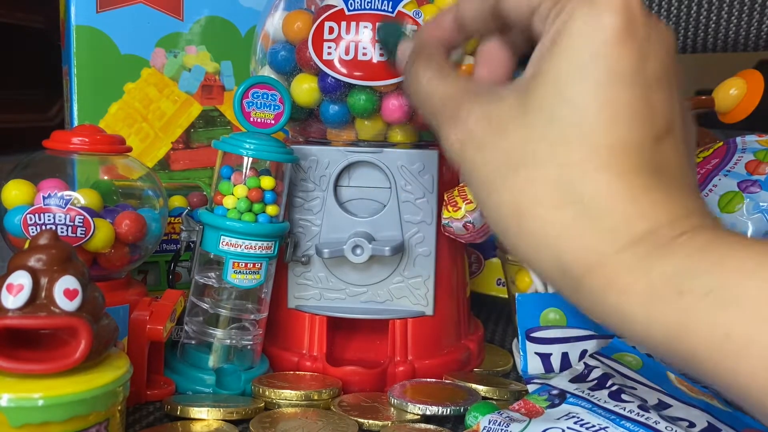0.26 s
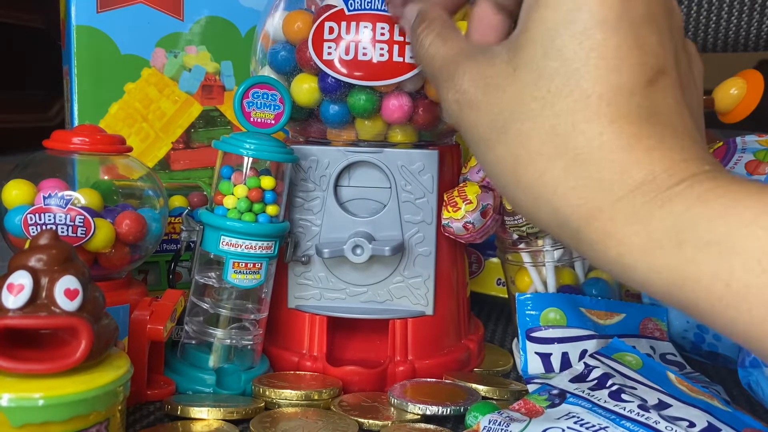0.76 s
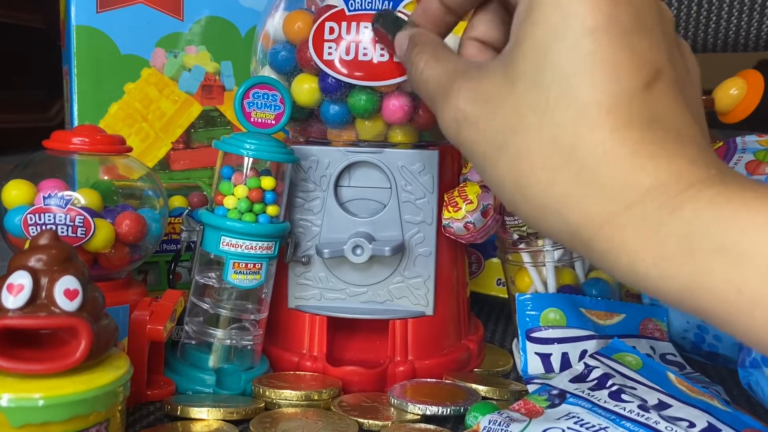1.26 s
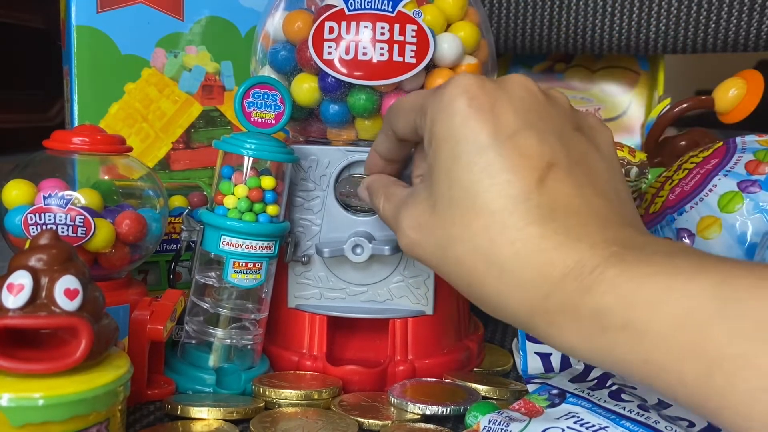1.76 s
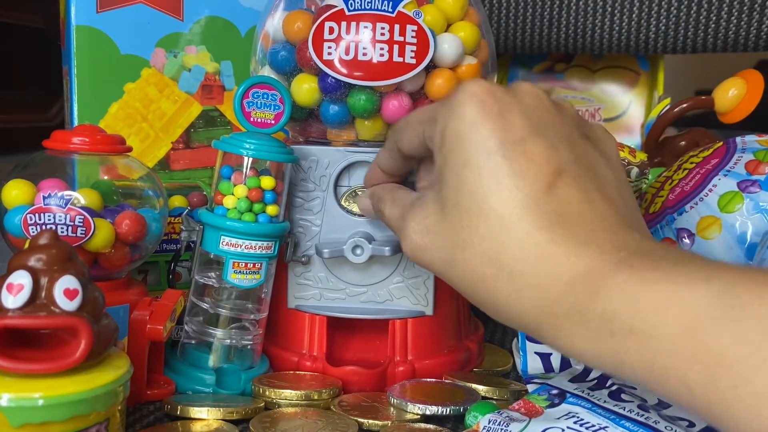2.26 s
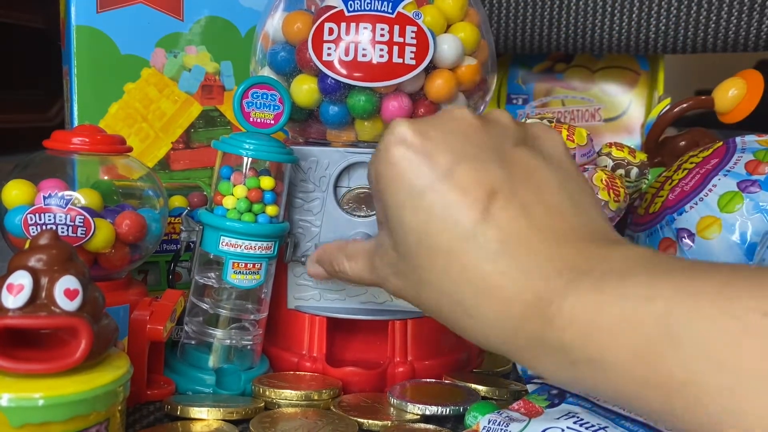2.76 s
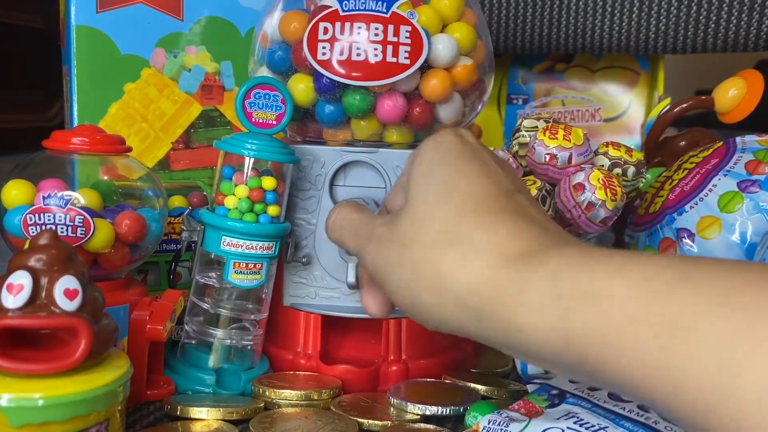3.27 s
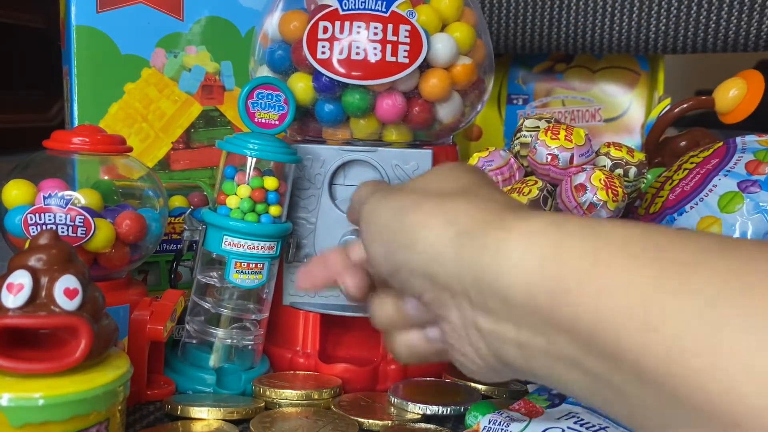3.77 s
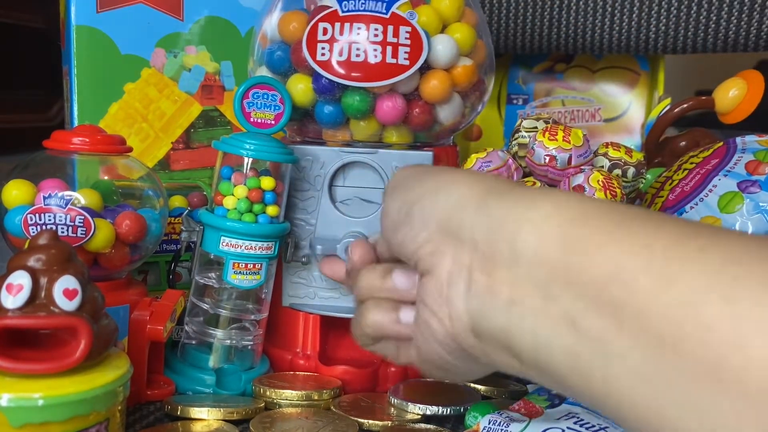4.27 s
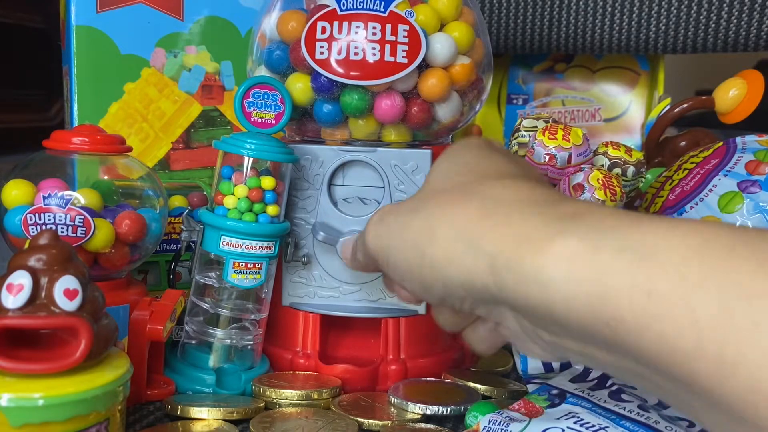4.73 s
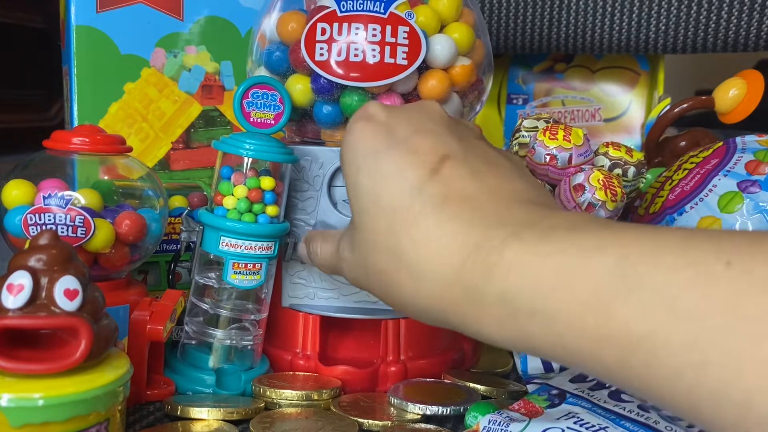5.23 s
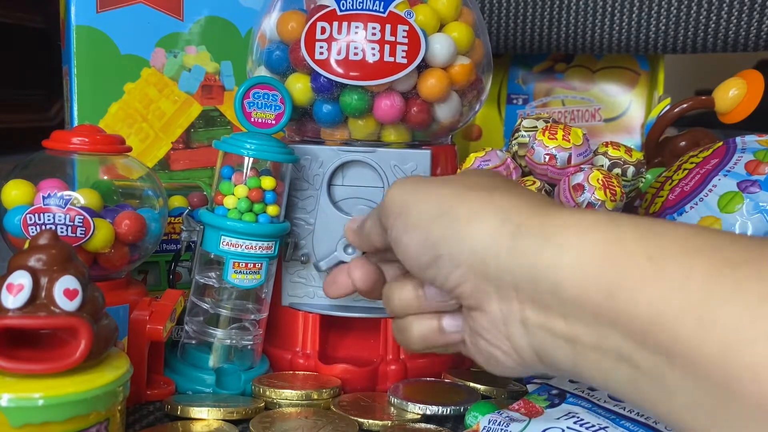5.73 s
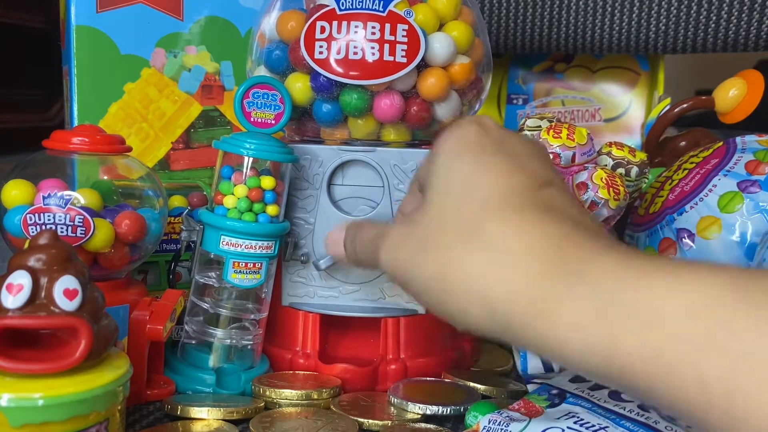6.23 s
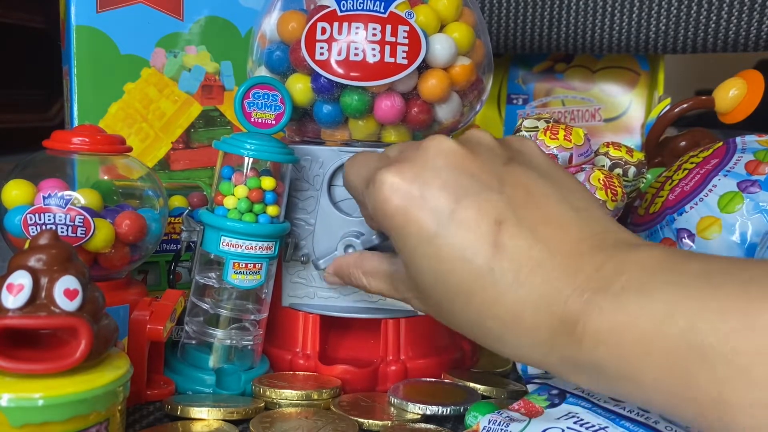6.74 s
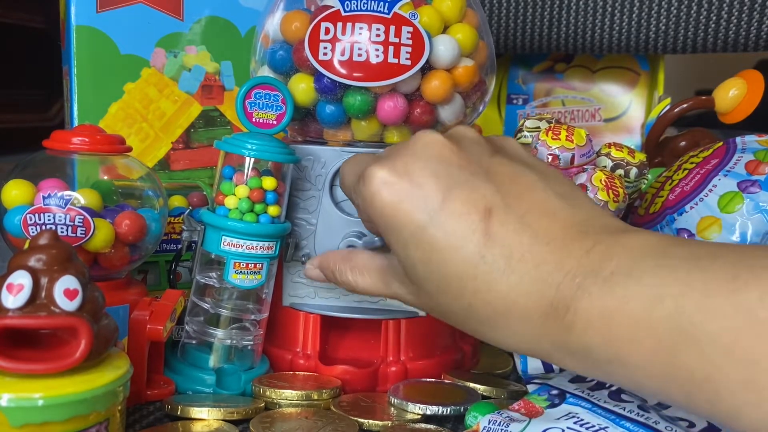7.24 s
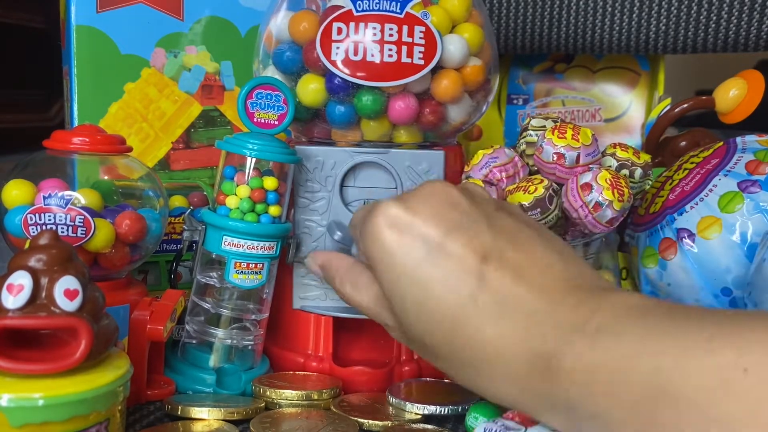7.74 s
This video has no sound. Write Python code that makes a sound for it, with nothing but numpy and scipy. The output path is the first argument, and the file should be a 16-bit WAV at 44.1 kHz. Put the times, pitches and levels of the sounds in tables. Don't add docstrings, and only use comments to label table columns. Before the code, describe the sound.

Close dry taps, a coin clicking at a slot, irregular plastic gear clacks and rattling candy in a small quiet room.

```python
import sys
import numpy as np
from scipy import signal
from scipy.fft import rfft, irfft, next_fast_len
from scipy.io import wavfile
from scipy.ndimage import uniform_filter1d

SR = 44100
rng = np.random.default_rng(int(sys.argv[2]) if len(sys.argv) > 2 else 0)


def pcm_store(signal):
    levels = np.round(np.clip(np.atleast_2d(signal), -1, 1) * 32767)
    wavfile.write(sys.argv[1], SR, levels.astype(np.int16).T)


def voltage_ratio(decibels):
    exponent = np.asarray(decibels, float) / 20
    return 10 ** exponent


N = 352800


def rms_one(x):
    return x / np.sqrt(np.mean(x ** 2) + 1e-20)


def in_time(rows):
    s, level = np.transpose(rows)
    return np.interp(np.arange(N) / SR, s, level)


def at_hz(points, hz):
    table_hz, value = np.transpose(points)
    return np.interp(np.log(hz), np.log(table_hz), value)


def drift(rate_hz):
    r = np.exp(-80 * np.pi * rate_hz / SR)
    noise = rng.standard_normal(N // 40 + 2002)
    slow = signal.lfilter([1], [1, -2 * r, r * r], noise)[2000:]
    return np.interp(np.arange(N) / 40, np.arange(len(slow)), rms_one(slow))


def bandpass(order, low_hz, high_hz):
    return signal.butter(order, [low_hz, high_hz], "band", fs=SR, output="sos")


def highpass(x, order, hz):
    return signal.sosfilt(signal.butter(order, hz, "high", fs=SR, output="sos"), x)


def stereo(mid, side, alike):
    return np.sqrt(1 + alike) * mid + np.sqrt(1 - alike) * side * [[1], [-1]]


BAND_EDGES = (180, 1200, 4000, 8000, 15000)


def resonances(modes, widen, crack_db, size):
    hz, width_hz, level_db = np.transpose(modes)[:, :, None]
    w = 2 * np.pi * np.arange(size // 2 + 1) / size
    z, r = np.exp(-1j * w), np.exp(-np.pi * width_hz * widen / SR)
    poles = 1 - 2 * r * np.cos(2 * np.pi * hz / SR) * z + r * r * z * z
    rings = voltage_ratio(level_db) * (1 - r * r) / 2 * (1 - z * z) / poles
    edges = zip(BAND_EDGES, BAND_EDGES[1:])
    bands = np.array([signal.sosfreqz(bandpass(2, low, high), w)[1] for low, high in edges])
    group = np.searchsorted(BAND_EDGES[1:-1], hz[:, 0])
    cracks = voltage_ratio(crack_db)[:, None] * bands ** 2
    return np.vstack([rings * bands[group], cracks]), np.append(group, range(4))


HARDNESS_SHARE = (0, 0.509, 1.01, 1.2)


def contacts(rows, colour_db):
    lift = np.array(HARDNESS_SHARE)
    return [(s, *(db + np.add(colour_db, hard_db * lift)), ms) for s, db, hard_db, ms in rows]


def strikes(events, modes, widen, crack_db, spread_db, softness, size=4096):
    out, t = np.zeros((2, N + size)), np.arange(size) / SR
    response, group = resonances(modes, widen, crack_db, size)
    even = [rms_one(irfft(response[group == g].sum(axis=0), size)) for g in range(4)]
    for s, *levels_db, chatter_ms in events:
        patches = voltage_ratio(2.5 * rng.standard_normal(size // 32)).repeat(32)
        grit = rng.standard_normal(size) * patches
        length = np.clip(chatter_ms, .5, 30) / 1000
        onset = np.minimum(t / (0.00027 + softness * length), 1)
        chatter = rfft(grit * onset * np.exp(-(t / length) ** 2))
        strength = voltage_ratio(spread_db * rng.standard_normal(len(group)))
        start = round(s * SR)
        for g, db in enumerate(levels_db):
            ring = irfft(chatter * (strength[group == g] @ response[group == g]), size)
            peak_power = uniform_filter1d(ring ** 2, size=96).max()
            ring *= voltage_ratio(db) / np.sqrt(2 * peak_power)
            out[:, start:start + size] += [ring, even[g] * np.sqrt(np.mean(ring ** 2))]
    return out[:, :N]


# (time [s], strength [dB], hardness [dB], chatter [ms])
TAPS = [
    (0.054, -36, -3, 2.3),
    (0.4294, -21.5, 9.5, 5.6),
    (0.6169, -31, 15, 4.2),
    (0.982, -22.5, 13, 5.3),
    (1.1807, -27.5, 14.5, 4.5),
]
# (frequency [Hz], width [Hz], level [dB])
GLOBE = [(675, 120, -6), (910, 110, -11), (1560, 130, -10), (2140, 170, -1), (3645, 32, 3), (4320, 130, -8),
         (4680, 110, -5), (4830, 80, -2), (5370, 80, -4), (5620, 70, 0), (6070, 80, -3), (6500, 150, -1),
         (7270, 120, -11)]


def globe_taps():
    taps = contacts(TAPS, colour_db=(-2, 1.5, 0, -1.5))
    globe = strikes(taps, GLOBE, widen=1, crack_db=(-18, -14, -12, -15), spread_db=3, softness=.12)
    return highpass(globe, 3, 360)


# (time [s], strength [dB], hardness [dB],
# chatter [ms])
KNOCKS = [(3.1026, -41.5, -2.5, 7), (3.1176, -38.5, -3, 5), (3.1324, -36, -21, 6.4), (3.152, -29, -18, 15),
          (3.1797, -32, -13, 4.2), (3.2323, -42, -2, 2.5), (3.257, -27, -8, 18), (3.514, -35.5, -12.5, 30),
          (3.536, -13.5, 1, 11), (3.574, -23.5, -9.5, 9.9), (3.742, -45, -3, 4), (3.7843, -50, -6, 4.7),
          (3.8739, -56.5, -2.5, 3.5), (3.9227, -53.5, -8, 4.6), (4.0844, -54.5, -29, 5),
          (4.163, -17, 2, 10.7), (4.1806, -25.5, -0.5, 22), (4.2101, -22.5, -7.5, 2.6),
          (4.2561, -33.5, -24.5, 17), (4.376, -42.5, 0.5, 7.5), (4.5843, -37, 2.5, 1.86),
          (5.1208, -69, 15, 4.4), (5.4763, -36.5, -5, 4.7), (5.8503, -44, -12, 2.5),
          (5.8922, -36.5, -5.5, 8.3), (5.9926, -43.5, -11, 2.7), (6.138, -42, -22, 2.6),
          (6.2186, -49.5, 3, 3), (6.493, -62, -14, 12.4), (7.625, -20, 4, 5.8), (7.6603, -26, -4, 7.3),
          (7.674, -29, -6, 12), (7.7006, -42.5, -8, 4.2), (7.797, -23.5, 5, 7.5),
          (7.8331, -31.5, -13.5, 2.7)]
# (time [s], strength [dB], hardness [dB], chatter [ms])
BUMPS = [(2.8698, -32.5, -13, 12), (2.988, -41.5, -18, 5.7), (4.3215, -36, 0, 4.2), (5.737, -29, -22, 4.2),
         (5.7915, -37, -19, 0.72), (6.0878, -39.5, -30, 5.8), (6.1264, -46.5, -30, 15),
         (6.3058, -52, 1.5, 5.3), (6.8995, -55, -16, 5), (7.7402, -36.5, 4.5, 4.8),
         (7.9166, -39.5, -10, 4.7)]
# (time [s], strength [dB], hardness [dB], chatter [ms])
TICKS = [(3.3674, -56, 0.5, 4.4), (3.5455, -30, -5.5, 7.9), (3.6424, -57, 11, 8.2),
         (3.6979, -51.5, -12, 11), (3.797, -55, 10.5, 2.9), (4.3579, -52.5, 5, 3), (4.399, -48.5, 5, 4.5),
         (5.3182, -42.5, -2, 28), (5.331, -50.5, 7.5, 0.8), (5.4396, -52.5, -11, 6.1),
         (5.6844, -47, -3, 2.1), (5.696, -51.5, 10, 7.9), (5.7567, -36, -29, 3),
         (5.8364, -46.5, -12.5, 1.2), (5.9191, -40, -24.5, 4.7), (7.7569, -46.5, -3.5, 6.9),
         (7.8098, -35, -2, 4.4), (7.9394, -44, -26, 5.6)]
# (time [s], strength [dB], hardness [dB], chatter [ms])
CHINKS = [
    (5.545, -15.5, -2, 6.5),
    (5.5635, -25.5, -6.5, 9.5),
    (5.612, -21, -6.5, 17),
    (5.6434, -35.5, 3.5, 9.4),
    (5.7755, -30, -14.5, 4),
    (6.1716, -37, -14, 0.65),
]
# (time [s], strength [dB], hardness [dB], chatter [ms])
SNAPS = [
    (2.7862, -59, -1, 6.1),
    (2.838, -42, 7, 4.1),
    (2.8474, -29, 2, 4.9),
    (3.214, -24, -12.5, 2.9),
    (4.5388, -45, -1, 1.9),
    (4.9197, -57, -5, 5),
    (6.3493, -66, 8.5, 2.7),
    (7.0361, -51, 8, 3.7),
    (7.6065, -16, 5, 11),
    (7.7675, -28.5, 0, 2),
]
# (frequency [Hz], width [Hz], level [dB])
CAVITY = [(199.9, 25, -16), (332.6, 65, -2), (480, 150, -11), (626, 240, -4.5), (729.7, 150, 0),
          (1020, 48, -6.5)]
# (frequency [Hz], width [Hz], level [dB])
SHELL = [(1298, 230, -11), (1572, 80, -8.5), (1855, 100, -2), (2140, 330, 3.5), (2617, 120, -3.5),
         (3040, 400, -13.5), (4240, 42, -19.5), (4960, 230, -11), (5540, 1100, -14.5), (6054, 220, -9.5),
         (6700, 1200, -12.5)]


def crank_turns():
    inside = contacts(KNOCKS, colour_db=(-1, -0.4, -0.16, -6))
    inside += contacts(BUMPS, colour_db=(-1, -7, -2, -9.5))
    inside += contacts(TICKS, colour_db=(-1, 10.5, 0, -15.5))
    inside += contacts(CHINKS, colour_db=(-0.5, -0.5, -3.5, -2))
    inside += contacts(SNAPS, colour_db=(-2.45, 0.5, -1.05, -0.5))
    return strikes(inside, CAVITY + SHELL, widen=.8, crack_db=(-18, -15, -16, -15), spread_db=6, softness=.3)


# (time [s], strength [dB], hardness [dB], chatter [ms])
SLOT = [(1.5942, -40.5, -6, 1.2), (1.6057, -35.5, -12, 11), (1.6881, -47, -12.5, 5.7),
        (1.7663, -37.5, -46, 1.46), (1.8725, -51, -6, 3.2), (1.886, -44, -15, 12), (1.9132, -37, -0.5, 7.7),
        (2.2228, -63, 5, 10), (2.2366, -43, -38, 19.5), (2.2516, -42, -15.5, 2.2), (2.5571, -57, -10, 9.8),
        (1.5905, -42, -21, 2.1)]
# (time [s], strength [dB], hardness [dB], chatter [ms])
RIM = [
    (0.0672, -39, 13, 13.4),
    (1.9477, -25.5, 1, 7.4),
    (1.96, -27, 2, 7),
    (2.4065, -40, 0, 5.9),
    (2.42, -61, -1, 8.9),
]
# (time [s], strength [dB], hardness [dB], chatter [ms])
FLICKS = [
    (3.507, -53.5, 2.5, 6.2),
    (5.317, -50.5, 10.5, 3),
    (5.862, -62, -1.5, 4),
    (5.888, -59, -0.5, 3.7),
    (6.03, -65.5, 1, 2.1),
    (6.126, -61.5, 4, 1.7),
    (6.167, -54.5, 4, 1.9),
    (6.277, -58.5, -1.5, 5.4),
    (7.586, -47.5, -6, 5),
]


def slot_and_flicks():
    light = contacts(SLOT, colour_db=(-4, 0.5, -1.5, -18))
    light += contacts(RIM + FLICKS, colour_db=(-2.45, 0.5, -1.05, -0.5))
    modes = CAVITY[4:] + SHELL
    return strikes(light, modes, widen=1, crack_db=(-26, -14, -14, -15), spread_db=4, softness=.15)


# (frequency [Hz], width [Hz], level [dB])
CHUTE = [(655, 240, 19), (1190, 320, 16), (2723, 120, -14), (3590, 260, 0.5), (5200, 370, -16.5),
         (6470, 130, -14.5)]


def ball_bounces(count=9):
    k = np.arange(count)
    first_flight_s, flight_s, shrink = .0681, .0442, .75
    flights = np.r_[0, first_flight_s, flight_s * shrink ** k[:-2]]
    landing_s = 4.2783 + np.cumsum(flights)
    level_db = -19 - 2.5 * k - 0.1 * k ** 2
    hardness_db, chatter_ms = -3.5 - 2 * k, 3.1 + 0 * k
    landings = contacts(np.c_[landing_s, level_db, hardness_db, chatter_ms], colour_db=(1, 5.5, -2, -5.5))
    chute = strikes(landings, CHUTE, widen=0.87, crack_db=(-24.0, -18.5, -18.0, -15), spread_db=1.5,
                    softness=0.073)
    return chute * voltage_ratio([[0], [-3]])


# (start [s], length [s], level [dB], swell or fade [dB], hardness [dB])
TUMBLE = [(0.068, 0.058, -38.5, -16.5, 3), (1.582, 0.14, -48, -25, -10.5), (1.841, 0.096, -64, 6, -11),
          (2.202, 0.045, -76, 27, -14), (2.234, 0.027, -53, -29, -7), (2.819, 0.03, -84, 52, -3),
          (2.847, 0.1, -26.5, -41.5, -41), (3.063, 0.14, -51.5, 4.5, -9), (3.212, .104, -41.5, -9, -18),
          (3.548, .064, -31.5, -4.5, -3), (3.611, 0.051, -32, -25, -6.5), (3.679, 0.22, -58, -1.5, -13),
          (4.175, 0.075, -27, -20, -6), (4.284, 0.011, -27, -27, -1), (4.287, 0.24, -42, -12.5, -18),
          (4.579, 0.25, -56, -6.5, -5), (5.274, 0.04, -84.5, 41.5, -7), (5.321, 0.22, -45.5, -22, -8.5),
          (5.551, .26, -32.5, -18.5, -12), (5.836, 0.222, -54.5, -4.5, -24), (6.081, .28, -61.5, -0.5, -13),
          (7.562, 0.049, -70, 51.5, -7.5), (7.64, .07, -29.5, -5, -10.5), (7.71, .05, -49.5, -19, -5.5),
          (7.797, 0.047, -20.5, -51, -3)]
RUB_COLOUR = (-1.5, -1, 0.24)


def rubbing():
    out, t = np.zeros((3, N)), np.arange(N) / SR
    for s, length, db, change_db, hard_db in TUMBLE:
        span = slice(round(s * SR), round((s + length) * SR))
        colour_db = np.add(RUB_COLOUR, hard_db * np.array(HARDNESS_SHARE[:3]))
        out[:, span] += voltage_ratio(db + change_db * (t[span] - s) / length + colour_db[:, None])
    return out


def tumble():
    sizes = voltage_ratio(3.2 * np.minimum(rng.exponential(1, N), 4))
    clicks_per_s = 1700 * voltage_ratio(6 * drift(50))
    clicks = (rng.random(N) < clicks_per_s / SR) * sizes
    size = 2 * next_fast_len(N // 2 + 2048)
    response, group = resonances(CAVITY + SHELL, 1.0, (-18.0, -3.5, -13.0, -15), size)
    low, middle, high = uniform_filter1d(rubbing(), size=300)
    out = 0
    for g, level in enumerate((low, middle, high, voltage_ratio(-3) * high)):
        signed = clicks * rng.choice([-1, 1], N)
        ring = irfft(rfft(signed, size) * response[group == g].sum(axis=0))[:N]
        out = out + level * rms_one(ring)
    return voltage_ratio(-5.0) * out


def pings(rows, size=4096):
    out, t = np.zeros(N + size), np.arange(size) / SR
    for s, db, hz, drive_ms in rows:
        width_hz = 70 + .025 * hz
        r, w = np.exp(-np.pi * width_hz / SR), 2 * np.pi * hz / SR
        u = t * 1000 / np.clip(drive_ms, 1, 50)
        burst = rng.standard_normal(size) * np.sqrt(u) * np.exp(-u * u)
        ring = signal.lfilter([1, 0, -1], [1, -2 * r * np.cos(w), r * r], burst)
        ring = signal.sosfilt(bandpass(1, .8 * hz, 1.25 * hz), ring)
        start = round(s * SR)
        out[start:start + size] += voltage_ratio(db) * ring / np.abs(ring).max()
    return out[:N]


# (time [s], peak [dB], frequency [Hz], drive [ms])
WALL_PINGS = [(0.0675, -26, 3590, 13.6), (0.0675, -20.5, 4700, 6.4), (1.597, -35.5, 1615, 10),
              (3.084, -47.5, 2090, 6), (3.104, -39, 6670, 4.4), (3.143, -52, 2650, 5.5),
              (3.179, -37, 2230, 5), (0.429, -16, 2115, 7), (3.258, -37, 2680, 8.4), (3.28, -46.5, 2720, 6),
              (3.31, -53, 2250, 5.2), (3.558, -30.5, 6700, 7.4), (3.566, -32, 4150, 9.9),
              (3.572, -29.5, 2660, 31), (3.578, -25, 1380, 14), (3.595, -30, 5030, 12),
              (3.598, -28, 2650, 11), (3.608, -30, 3690, 8), (3.644, -34.5, 3660, 4.9),
              (3.644, -33, 5100, 5), (3.692, -48.5, 2230, 18), (4.205, -31.5, 2730, 13),
              (4.211, -25.5, 3470, 8), (4.255, -39, 3580, 4.2), (4.288, -37.5, 2780, 10),
              (4.352, -40, 2760, 18), (4.375, -39, 2240, 5), (4.388, -26, 2360, 1.7), (4.4, -38, 2380, 19),
              (5.35, -44.5, 1780, 12), (7.035, -52.5, 1720, 5.6), (7.8, -31.5, 4800, 6.6)]
# (time [s], peak [dB], frequency [Hz], drive [ms])
HOLLOW_PINGS = [(0.429, -31.5, 498, 3.7), (0.981, -30.5, 452, 4.2), (1.597, -37, 830, 8.6),
                (2.405, -46.5, 330, 14), (3.085, -40.5, 723, 30), (3.262, -31, 685, 15),
                (3.512, -35, 740, 16), (5.312, -42, 724, 45), (5.321, -41.5, 1150, 30),
                (5.408, -45.5, 700, 20), (5.4745, -29.5, 736, 3.1), (7.61, -25, 540, 19)]
# (time [s], peak [dB], frequency [Hz], drive [ms])
COIN_PINGS = [
    (5.543, -31.5, 12080, 8.8),
    (5.548, -23, 11570, 15),
    (5.572, -34, 11600, 21),
    (5.6, -20.5, 11640, 22.5),
    (5.643, -31.5, 11530, 18),
]
# (time [s], peak [dB], frequency [Hz], drive [ms])
CONTACT_PINGS = [(1.605, -38, 1490, 9.2), (1.615, -48.5, 770, 29), (1.687, -48, 1100, 5.3),
                 (1.853, -50, 903, 42), (1.856, -49.5, 1450, 25), (1.946, -23.5, 1580, 5.8),
                 (1.959, -29, 1960, 12), (2.847, -30.5, 1854, 5.1), (2.852, -30.5, 1020, 8.7),
                 (2.866, -38, 1770, 16), (2.98, -55, 596, 9.6), (0.982, -27, 5670, 6), (1.181, -28, 4700, 5.4),
                 (1.183, -36, 7330, 24), (0.616, -26, 5220, 8),
                 (4.168, -29, 2140, 10), (4.183, -24, 640, 9), (4.208, -26, 760, 15), (5.683, -45, 700, 4.6),
              (5.698, -46, 5900, 5), (5.79, -36.5, 1100, 6.6), (5.835, -49, 2800, 5.5),
              (5.851, -44, 1210, 3.2), (5.888, -44, 1750, 4), (5.893, -44, 7200, 7.6),
              (5.92, -46.5, 1160, 8), (5.992, -49, 6340, 5.6), (6.086, -61, 4780, 4),
              (6.086, -65, 10300, 5), (6.128, -52.5, 2710, 3.7), (6.138, -45.5, 2200, 4.7),
              (6.155, -53, 10300, 66), (6.215, -58, 10200, 21), (6.27, -60, 10300, 45),
              (6.277, -63, 6900, 5), (6.306, -57.5, 6800, 14), (7.597, -35.5, 890, 8),
              (7.608, -23, 6960, 12), (7.653, -35, 750, 14), (7.767, -21.5, 2000, 3.2),
              (7.797, -21, 2720, 17), (7.815, -28.5, 757, 9), (7.833, -34.5, 2100, 10)]


def spot_pings():
    return pings(WALL_PINGS + HOLLOW_PINGS + COIN_PINGS + CONTACT_PINGS)


# (time [s], peak [dB], frequency [Hz], drive [ms])
DRY_PINGS = [
    (0.0675, -28, 6200, 2),
    (0.078, -38, 4900, 43),
    (3.162, -40.5, 418, 8.9),
    (3.263, -32, 2400, 4),
    (4.322, -33.5, 6600, 7.4),
    (4.357, -36, 6700, 5),
    (4.488, -44, 1500, 20),
    (5.547, -24, 6300, 5.1),
    (5.616, -23, 5100, 9),
    (5.776, -35.5, 2100, 5),
]


def dry_pings():
    return pings(DRY_PINGS) * [[1], [1]]


# (frequency [Hz], level [dB], t60 [s])
PAWL = [
    (2681, -3, .16),
    (4242, -4, .11),
    (5044, -9, .16),
]
# (time [s], level [dB])
PAWL_HITS = [
    (3.575, -42),
    (4.205, -46),
    (5.835, -70),
    (5.89, -46),
    (5.922, -70),
    (7.8, -36),
    (7.83, -46),
    (7.917, -64),
]


def pawl():
    out, (s, db) = 0, np.transpose(PAWL_HITS)
    for hz, level_db, t60 in PAWL:
        clicks = np.full(N, 1e-18)
        clicks[(s * SR).astype(int)] = voltage_ratio(db + level_db + 2.0 * rng.standard_normal(len(s)))
        r, w = voltage_ratio(-60 / (t60 * SR)), 2 * np.pi * hz / SR
        line = signal.lfilter([0, np.sin(w)], [1, -2 * r * np.cos(w), r * r], clicks)
        out = out + line * voltage_ratio(5 * drift(60))
    return out


# (time [s], peak [dB], frequency [Hz], t60 [ms])
THUDS = [
    (3.539, -50, 110.4, 190),
    (3.577, -41, 166.3, 49),
    (3.953, -47, 59.95, 97),
    (5.553, -32.5, 206, 100),
    (5.62, -40.5, 144, 110),
    (7.61, -43, 63.3, 49),
]


def thuds():
    out, t = np.zeros(N + SR), np.arange(SR // 2) / SR
    for s, peak_db, hz, t60_ms in THUDS:
        decay = voltage_ratio(-60000 * t / t60_ms) * np.minimum(t / 0.0041, 1)
        swing = np.sin(2 * np.pi * hz * t) * decay
        start = round(s * SR)
        out[start:start + len(t)] += voltage_ratio(peak_db) * swing / np.abs(swing).max()
    return out[:N] * voltage_ratio([[1.5], [-1.5]])


def ports(pair, lag_samples, pan_db):
    size = 2 * next_fast_len(N // 2 + 64)
    w = 2 * np.pi * np.arange(size // 2 + 1) / size
    turn = np.exp(-1j * w * np.array([[lag_samples], [0]]))
    return irfft(rfft(pair, size) * turn, size)[:, :N] * voltage_ratio([[pan_db / 2], [-pan_db / 2]])


# (frequency [Hz], t60 [s])
ROOM_T60 = [(200, 0.21), (1000, 0.17), (3000, 0.22), (6000, 0.22), (9000, 0.27), (14000, 0.15)]
# (frequency [Hz], level [dB])
ROOM_COLOUR = [(200, -12.5), (1000, -6), (3000, -9), (5500, -9.5), (9000, -19), (14000, -17)]


def room(x, gap_s, alike):
    length = int(.7 * SR)
    t, edges = np.arange(length) / SR, 150 * 2 ** np.arange(0, 7.1, .75)
    shared, left, right = rng.standard_normal((3, 2, length))
    white = np.sqrt(alike) * shared + np.sqrt(1 - alike) * np.array([left, right])
    tail = 0
    for k, (low, high) in enumerate(zip(edges, edges[1:])):
        hz = np.sqrt(low * high)
        noise = signal.sosfilt(bandpass(2, low, high), white[:, k % 2])
        decay = voltage_ratio(-60 * t / at_hz(ROOM_T60, hz)) * np.clip(t / gap_s, 0, 1)
        tail = tail + voltage_ratio(at_hz(ROOM_COLOUR, hz)) * noise * decay / np.sqrt(np.sum(decay ** 2))
    return signal.fftconvolve(x[None], tail, axes=1)[:, :N]


# (frequency [Hz], level [dB per Hz])
AIR = [(59, -32), (100, -3), (330, -6), (728, -5), (877, -3.5), (2320, -20), (2730, -25.5), (14000, -43.5)]
# (frequency [Hz], likeness [-1 to 1])
LIKENESS = [(60, 1), (240, -0.053), (950, -0.75), (3770, 0.98), (15000, -0.19)]
# (time [s], level [dB])
AIR_LEVEL = [(0, -69), (.6, -69), (1.5, -71.5), (2.8, -72), (3.5, -67), (5.2, -73), (6.5, -75.5), (8, -68)]


def room_tone(patchy_db):
    out, edges = 0, 90 * 2 ** np.arange(0, 7.6, .5)
    white = rng.standard_normal((2, 2, N))
    for k, (low, high) in enumerate(zip(edges, edges[1:])):
        mid, side = signal.sosfilt(bandpass(2, low, high), white[k % 2])
        hz = np.sqrt(low * high)
        alike = np.clip(at_hz(LIKENESS, hz), -1, 1)
        gain = voltage_ratio(at_hz(AIR, hz) + patchy_db * drift(1.5))
        out = out + gain * stereo(mid, side, alike)
    return voltage_ratio(in_time(AIR_LEVEL) + 7.0) * rms_one(out)


# (time [s], level [dB])
RUMBLE = [(0.0, -64), (1.67, -78), (2.36, -60), (2.69, -76), (3.63, -62.5), (3.83, -79), (3.99, -60),
          (4.05, -68.5), (5.41, -74.5), (5.66, -57), (5.88, -75.5), (8.0, -67)]


def rumble(low_hz, high_hz, alike):
    noise = rng.standard_normal((2, N + SR))
    mid, side = signal.sosfilt(bandpass(2, low_hz, high_hz), noise)[:, SR:]
    pair = rms_one(stereo(mid, side, alike))
    return voltage_ratio(in_time(RUMBLE)) * pair * voltage_ratio([[1.5], [-1.5]])


def scene():
    globe = globe_taps()
    body = highpass(crank_turns() + slot_and_flicks() + tumble(), 2, 240)
    spot = highpass(ball_bounces() + (spot_pings() + pawl()) * voltage_ratio([[0], [-9]]), 2, 240)
    near = ports(globe[[0, 0]], 0.36, .2) + ports((body + spot)[[0, 0]], 3.16, 0.24)
    near = near + ports(dry_pings(), 3.0, .2)
    globe_to_room = globe[1] + 0.22 * globe[0]
    body_to_room = voltage_ratio(-0.5) * (body[1] + 0.76 * body[0] + spot[1])
    far = room(globe_to_room + body_to_room, gap_s=0.0033, alike=0.2)
    return near + far + thuds() + room_tone(patchy_db=2.5) + rumble(45, 75, alike=0.9)


def band(x, low_hz, high_hz):
    return signal.sosfiltfilt(bandpass(3, low_hz, high_hz), x)


def smear(x, lead_s):
    size = 2048
    rise = np.clip(1 - np.arange(size)[::-1] / SR / lead_s, 0, 1)
    haze = rng.standard_normal(size) * rise
    haze = haze[None] / np.linalg.norm(haze)
    return signal.fftconvolve(band(x, 560, 8000), haze, axes=1)[:, size - 1:]


def low_pass(x):
    return signal.sosfilt(signal.butter(12, 16650, fs=SR, output="sos"), x)


def record(dry):
    dry = highpass(dry, 2, 42)
    dry = signal.sosfilt(signal.butter(4, 15500, fs=SR, output="sos"), dry)
    dry = dry + voltage_ratio(-29.0) * smear(dry, 0.015)
    low = signal.sosfiltfilt(signal.butter(8, 5600, fs=SR, output="sos"), dry)
    high = dry - low
    spread = 0.97 * high[1] + 0.038 * high
    both = low + ports(spread, -7.0, 0.14)
    mid, side = (both[0] + both[1]) / 2, (both[0] - both[1]) / 2
    mid = mid - 0.7 * band(mid, 8000, 9500) - .55 * band(mid, 12200, 15800)
    side = side - .7 * band(side, 11500, 13400)
    both = np.array([mid + side, mid - side])
    mix = .95 * np.tanh(both / .95)
    return low_pass(mix)


dry = scene()
out = record(dry)
pcm_store(out)
```